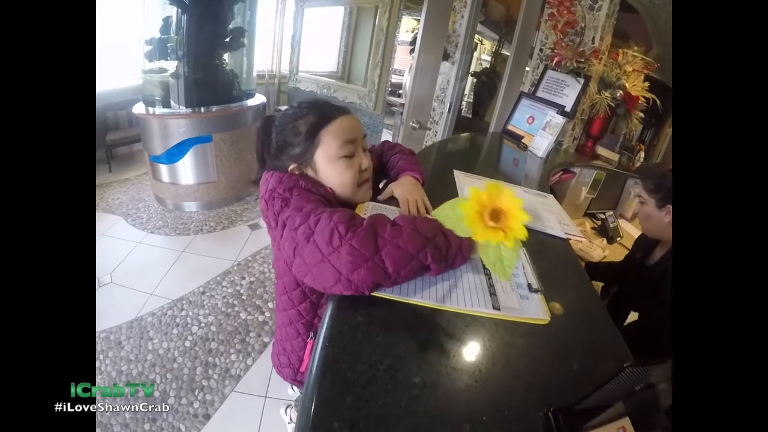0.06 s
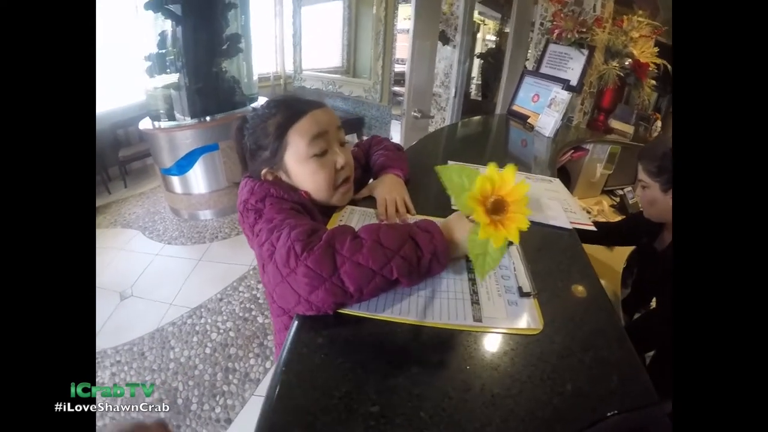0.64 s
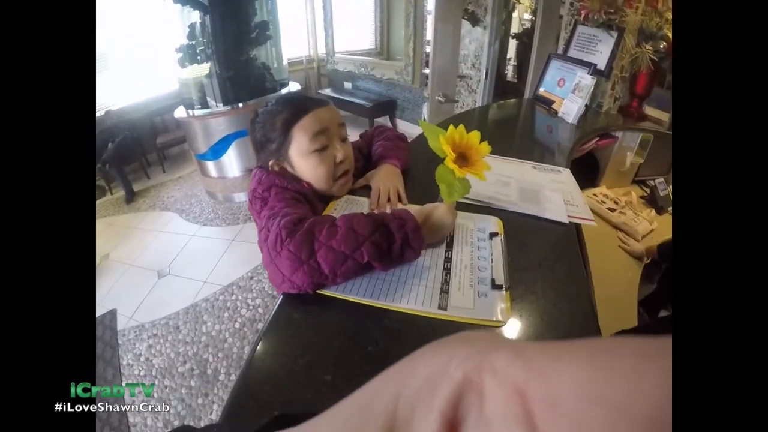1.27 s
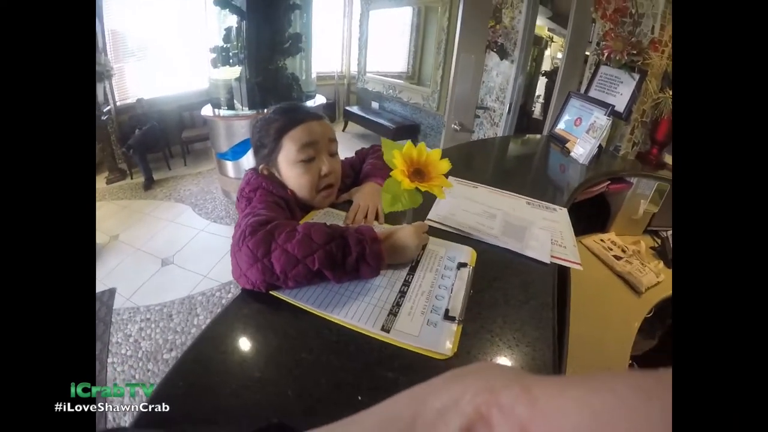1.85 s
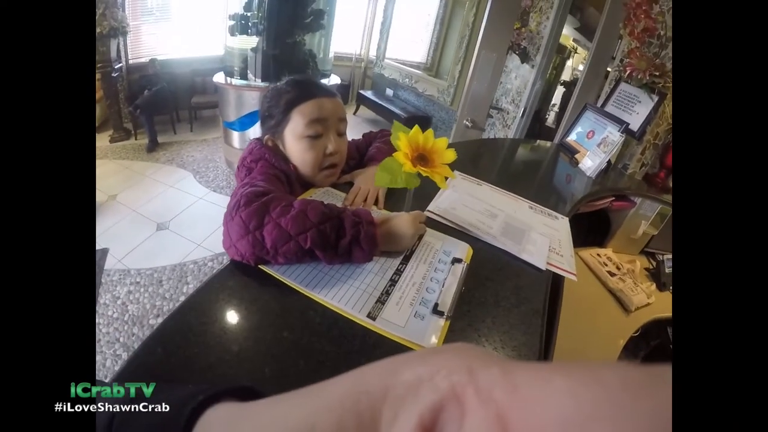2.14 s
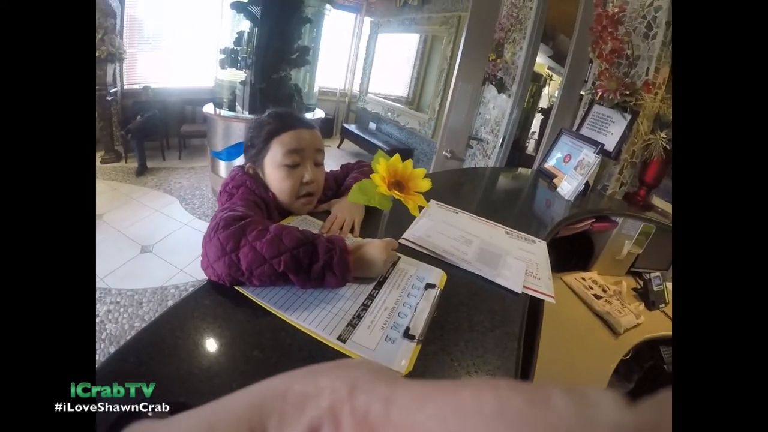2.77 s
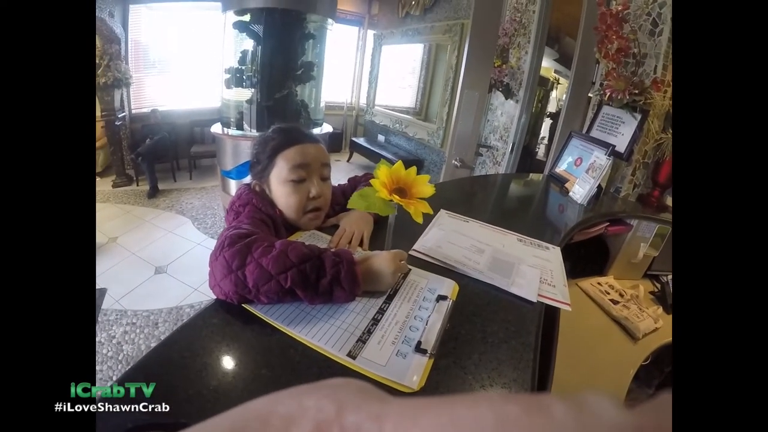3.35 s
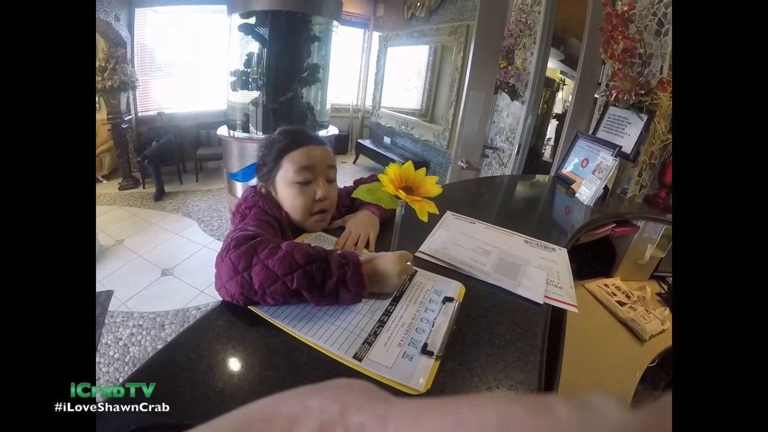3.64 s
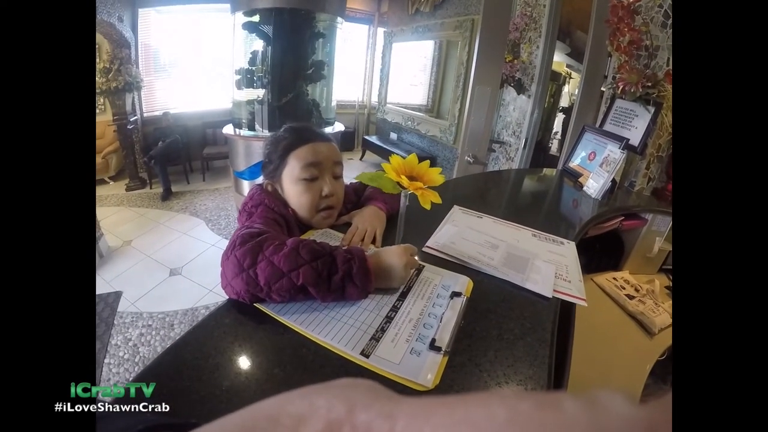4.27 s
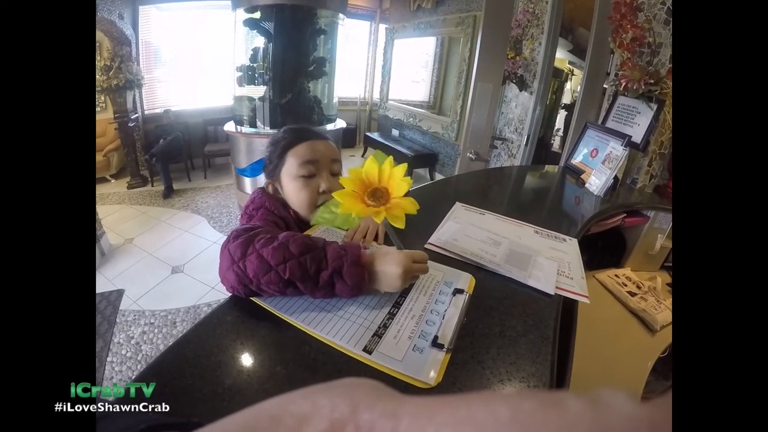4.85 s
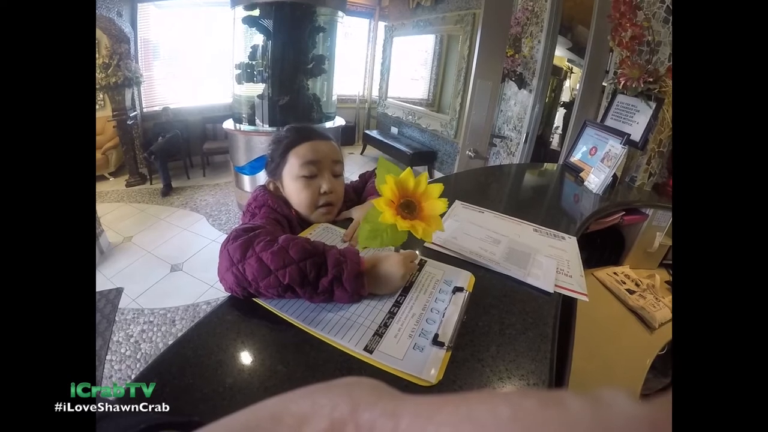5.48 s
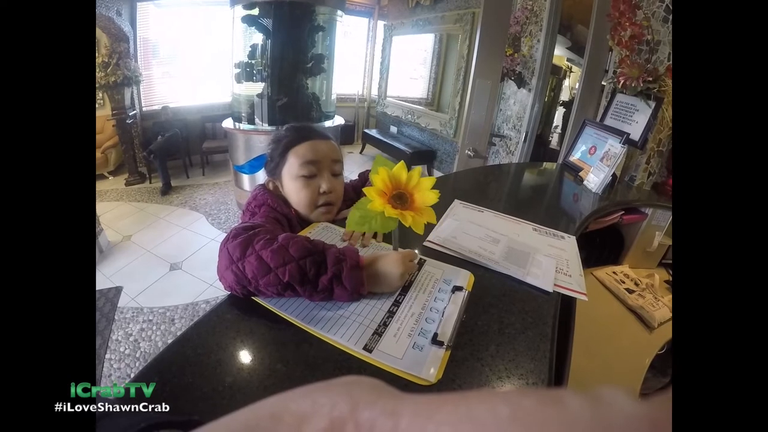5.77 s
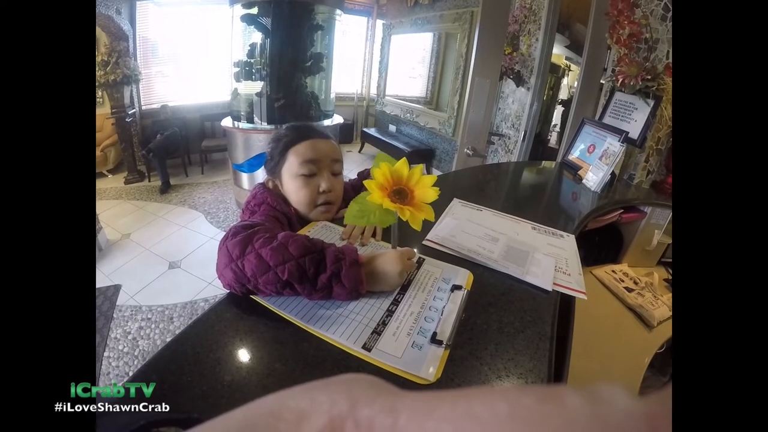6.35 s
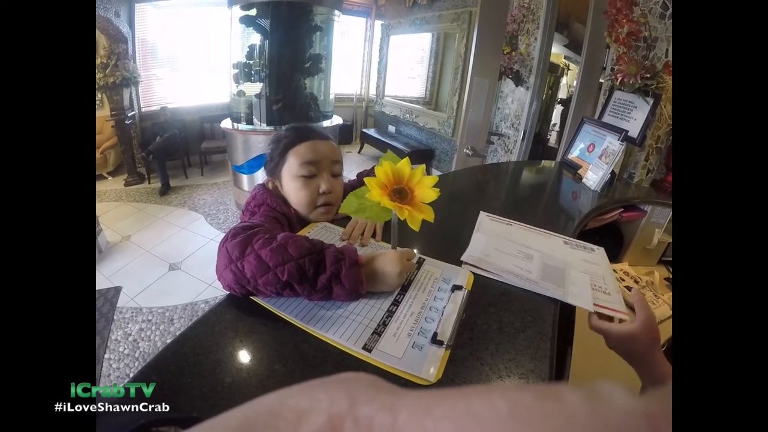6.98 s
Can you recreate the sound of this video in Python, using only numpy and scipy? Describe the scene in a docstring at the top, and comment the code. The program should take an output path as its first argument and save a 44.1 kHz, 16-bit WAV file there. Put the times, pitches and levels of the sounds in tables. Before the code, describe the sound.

For the first 1.2 seconds, fingers rub over a small camera's case, close and wide in stereo. From about 0.6 seconds they knock on it in a quick, loud cluster with dry plastic creaks, ending in a deep palm bump. A short silence follows.

At 1.4 seconds a pen starts writing on paper on a clipboard, in mono and much quieter than the knocks. Quick, scratchy strokes hiss while the board rings lightly beneath, strongest until about 2.3 seconds, when the room hiss also drops. Lighter strokes with small tip taps run from 2.7 to 4.5 seconds, pause briefly, and resume from 4.7 to 6.4 seconds. Between about 6.5 and 7 seconds a sheet slides very faintly over the desk. Faint air noise and ventilation hum lie under the writing, with little echo.

```python
"""A pen writes in quick strokes on paper on a clipboard, heard in mono: the tip hisses over the
fibres and the board rings under it. Before the writing, in stereo, fingers shift on a small camera,
rubbing and knocking its case between the two microphone ports; a short silent gap follows.
At the end a sheet slides over the desk. Faint air noise and ventilation hum lie under the writing."""
import sys
import numpy as np
from scipy import signal
from scipy.fft import rfft, irfft, next_fast_len
from scipy.io import wavfile
from scipy.ndimage import map_coordinates

SR = 44100
rng = np.random.default_rng(int(sys.argv[2]) if len(sys.argv) > 2 else 0)


def unload_wav(signal):
    """Save mono or channel-first audio to the path in sys.argv[1] as 16-bit WAV at rate SR, clipped to [-1, 1]."""
    wavfile.write(
        sys.argv[1],
        SR,
        np.round(np.clip(np.atleast_2d(signal).T, -1, 1) * 32767).astype(np.int16),
    )


N = 309566
TIME = np.arange(N) / SR
WRITING_FROM_S = 1.388

# pen strokes: start_s, speed_up_s, slow_down_s, level_db
PEN_STROKES = [(1.387, 0.0056, 0.04, -41.5), (1.411, 0.053, 0.059, -22.5), (1.524, 0.024, 0.066, -22),
               (1.589, 0.06, 0.047, -25.5), (1.707, 0.015, 0.07, -29.5), (1.776, .054, 0.057, -29),
               (1.89, 0.064, 0.043, -31), (2.004, 0.031, 0.043, -28.5), (2.096, 0.02, 0.056, -38),
               (2.147, 0.063, .035, -27), (2.252, 0.016, 0.09, -25), (2.612, 0.024, .085, -63.5),
               (2.746, 0.019, 0.071, -36.5), (2.835, 0.064, 0.031, -38), (2.927, 0.051, 0.04, -35),
               (3.022, 0.055, 0.031, -37), (3.111, 0.024, 0.074, -38), (3.189, .04, 0.047, -38),
               (3.281, 0.015, 0.059, -41), (3.328, 0.069, .029, -43.5), (3.442, .011, 0.043, -45.5),
               (3.503, 0.03, 0.026, -47.5), (3.576, 0.064, 0.049, -35.5), (3.697, .021, 0.018, -44.5),
               (3.734, 0.066, .015, -60), (3.811, .03, 0.07, -38.5), (3.911, 0.047, 0.025, -39),
               (3.999, .013, 0.068, -42), (4.079, .042, 0.023, -38), (4.164, 0.023, 0.046, -45.5),
               (4.256, 0.024, 0.028, -41), (4.324, .014, 0.068, -46), (4.411, 0.013, 0.011, -52.5),
               (4.42, 0.046, 0.081, -63), (4.74, 0.029, .012, -52.5), (4.788, 0.027, 0.095, -37.5),
               (4.971, 0.064, 0.059, -35), (5.084, 0.052, 0.053, -32.5), (5.181, 0.034, 0.11, -45),
               (5.262, 0.058, 0.043, -45.5), (5.383, 0.012, .066, -44.5), (5.452, 0.056, 0.035, -43),
               (5.567, .01, 0.057, -59), (5.612, 0.027, 0.066, -50.5), (5.687, 0.033, 0.06, -49),
               (5.768, 0.03, 0.059, -43), (5.887, .061, .072, -34.5), (6.031, 0.042, 0.057, -34),
               (6.13, 0.027, 0.06, -39.5), (6.201, 0.067, 0.034, -36.5), (6.305, 0.019, 0.056, -35.5),
               (6.357, .007, 0.079, -52.5)]
# where pen and paper ring, as a scratch and a higher fizz: pitch_hz, width_hz, level_db
SCRATCH_MODES = [(2130, 670, -15), (2740, 315, 3), (3226, 400, 1), (4900, 790, -3), (6090, 470, -3.5)]
FIZZ_MODES = [(7510, 710, 0), (9270, 480, -0.5), (11150, 500, -7.5), (12360, 830, 0.5), (14700, 1700, -8.5)]
# where the clipboard rings, and its deep notes, unevenly damped by the hand: pitch_hz, width_hz, level_db
BOARD_MODES = [(585.6, 79, -1.5), (771.3, 33.3, 4.5), (874, 47, -2.5), (1081, 54, -0.5), (1184, 52, -2.5),
               (1361, 77, -5.5), (1618, 55, -1), (2040, 260, -4.5)]
DEEP_MODES = [(191, 20.4, -17), (225, 28, -11.5), (308.8, 18.5, 1.5), (402.5, 31, 3.5), (468, 50, -2.5)]


def pen_writing(scratch_db=-1.5, fizz_db=-3, board_db=-2, deep_db=-3, unsteady_db=1.09):
    """A faster tip is louder and brighter; the board follows the speed less closely."""
    tip, force = np.zeros(N), np.zeros((2, N))
    for start, rise, fall, db in PEN_STROKES:
        n = int((rise + fall) * SR)
        speed = hand_speed(start, rise, fall, start + np.arange(n) / SR)
        scratch, fizz, board, deep = grip_levels(start + rise, db)
        pressure = amp(unsteady_db * wobble(115.6, n))
        rasp = tip_noise(SCRATCH_MODES, n, edge_hz=1600, drift=0.012, vary_db=4, rough_db=2)
        rasp *= amp(scratch + scratch_db) * speed ** 1.44
        hiss = tip_noise(FIZZ_MODES, n, edge_hz=6100, drift=0.014, vary_db=1.5, rough_db=1.5)
        hiss *= amp(fizz + fizz_db) * speed ** 1.77
        add(tip, start, pressure * (rasp + hiss))
        push = pressure * speed ** 0.81 * friction(250, 1.1, n)
        add(force, start, push * amp([[board + board_db], [deep + deep_db]]))
    ring = clipboard(force[0], BOARD_MODES, edge_hz=164)
    return tip + ring + clipboard(force[1], DEEP_MODES, edge_hz=110)


# the hand shifts its grip and weight, colouring the strokes: time_s, fizz_db, board_db, deep_db
HAND_GRIP = [(1.45, -2.5, -2.5, -4.5), (1.8, 0, -5.5, -11.5), (2.28, -.5, -3.5, -8.5),
             (2.88, 2.5, -12.5, -11), (3.15, 3, -13, -10), (3.5, 2.5, -14.5, -23), (3.65, 7.5, -13, -13.5),
             (3.85, 3, -12.5, -20), (4.33, 4.5, -10, -19.5), (4.82, 5, -17, -17.5), (5.03, 3.5, -13, -12.5),
             (5.31, 6.5, -17, -24), (5.42, 3, -8, -13), (5.71, 6, -9, -18), (5.8, 6, -19.5, -20.5),
             (6.07, 5, -10, -12), (6.18, 3, -14.5, -21)]


def grip_levels(time_s, db, usual_db=-47.5, fizz_growth=0.26, board_growth=0.74):
    """Scratch, fizz, board and deep board in dB: a harder stroke is brighter; the board grows less."""
    fizz, board, deep = curves(HAND_GRIP, time_s)
    effort = db - usual_db
    bright = fizz + fizz_growth * effort
    scratch = db - 10 * np.log10(1 + amp(bright) ** 2)  # scratch and fizz share the stroke's power
    shake = usual_db + board_growth * effort
    return scratch, scratch + bright, shake + board, shake + deep


def tip_noise(modes, n, edge_hz, drift, vary_db, rough_db, fine_db=2.5, fine_hz=170, glide=0.011):
    """Paper fibres pluck the tip; the pitches it rings at shift with the grip from stroke to stroke."""
    chance = rng.standard_normal((len(modes), 2))
    moved = [(hz * (1 + drift * a), width, db + vary_db * b)
             for (hz, width, db), (a, b) in zip(modes, chance)]
    power = lambda f: sum(amp(db) ** 2 / (1 + (2 * (f - hz) / width) ** 2) for hz, width, db in moved)
    colour = lambda f: highpass(f, edge_hz) * np.sqrt(power(f)) * amp(fine_db * ripple(f, fine_hz))
    hiss = filtered(friction(1500, rough_db, n), colour)
    # the pen tilts as it moves, so its pitches also glide within a stroke
    place = np.cumsum(1 + glide * wobble(13, n))
    return unit(map_coordinates(hiss, [place], mode="mirror"))


def clipboard(force, modes, edge_hz):
    """The board rings under the tip; plain white noise would come out as strong as it went in."""
    board = lambda f: resonances(modes, f) * highpass(f, edge_hz) / np.sqrt(1 + (f / 2500) ** 4)
    average_gain = np.sqrt(np.mean(np.abs(board(np.fft.rfftfreq(SR, 1 / SR))) ** 2))
    return filtered(force, board) / average_gain


# the tip lands on the paper: time_s, level_db, board_share_db
PEN_TAPS = [(1.397, -33.5, 2.5), (2.736, -27, -8), (3.148, -24, -17), (3.74, -40, -38), (3.794, -39.5, -28),
            (4.764, -28.5, -13), (4.973, -27.5, -19), (5.392, -36, -14), (6.019, -44, -14)]


def pen_taps(click_db=2, knock_db=9, deep_db=10, click_fade_s=0.012, knock_fade_s=0.0089, rise_s=0.001):
    """The landing tip clicks and kicks the board."""
    click, force = np.zeros(N), np.zeros(N)
    t = np.arange(SR // 10) / SR
    delay_s = 0.002  # the paper gives way before the tip meets the board
    for start, db, share_db in PEN_TAPS:
        burst = amp(db) * (1 - np.exp(-t / rise_s)) * rng.standard_normal((2, len(t)))
        add(click, start, burst[0] * amp(click_db - 60 * t / click_fade_s))
        add(force, start + delay_s, burst[1] * amp(share_db - 60 * t / knock_fade_s))
    tick = filtered(click, lambda f: resonances(SCRATCH_MODES, f) + amp(-8) * resonances(FIZZ_MODES, f))
    knock = amp(knock_db) * clipboard(force, BOARD_MODES, edge_hz=170)
    return tick + knock + amp(deep_db) * clipboard(force, DEEP_MODES, edge_hz=170)


# fingers slip, knock and slide on: start_s, level_db, treble_db_per_octave, slide_db, slide_s
FINGER_KNOCKS = [(0.058, -31, -8, -56, .03), (0.185, -17.5, -20, -46, .035), (.582, 2, -1.5, -23, .08),
                 (0.6898, 2, 3.5, -28, 0.053), (0.783, 0, 0, -29, 0.042), (.849, -19, -7.5, -52, .04),
                 (.9003, 0.5, -17, -27, 0.07), (0.968, 2, -3, -32.5, 0.037), (1.0483, -0.5, -1, -23, 0.058),
                 (1.131, -7.5, -2, -24.5, 0.033)]
# notes of the case (a minus gain pushes a port the other way): pitch_hz, swell_s, left_gain, right_gain
CASE_MODES = [(188, 0.0021, -0.13, 0.73), (380, 0.0008, -0.5, 0.37), (596, 0.00052, -0.33, 0.47),
              (940, 0.00027, -0.59, 0.33), (2160, 0.0011, 0.084, .06), (4630, 0.00017, 0.062, 0.017)]


def finger_knocks(shape=1.4, detune=0.025, lag_s=0.0001, treble_from_hz=700):
    """Soft fingers knock the case and damp it quickly; the flex reaches the left port later."""
    out, t = np.zeros((2, N)), np.arange(SR // 20) / SR
    age = np.maximum([t - lag_s, t + lag_s / 2], 0)
    for start, db, tilt, *_ in FINGER_KNOCKS:
        for hz, swell, left, right in CASE_MODES:
            envelope = (age / swell * np.exp(1 - age / swell)) ** shape
            tone = np.sin(2 * np.pi * hz * (1 + detune * rng.normal()) * age)
            gain = amp(db + tilt * np.log2(max(hz / treble_from_hz, 1)))
            add(out, start, gain * envelope * tone * [[left], [right]])
    # the camera's wind filter cuts the deep bass from the knocks
    return filtered(out, lambda f: highpass(f, edge_hz=144, order=12))


def finger_slides(rise_share=0.52):
    """Strength of the short slide that follows each knock."""
    return sum(amp(db) * hand_speed(start, rise_share * length, (1 - rise_share) * length)
               for start, _, _, db, length in FINGER_KNOCKS)


# fingers drag over the case: time_s, rub_db, hiss_db
FINGER_DRAG = [(0, -46.5, -44), (.16, -43.5, -45.5), (.25, -37, -48), (.32, -29, -43), (.48, -27.5, -41),
               (.56, -27, -42), (.66, -32.5, -48.5), (.75, -43, -56), (.84, -42, -53.5), (.88, -38.5, -57),
               (.945, -31, -35), (1.005, -36.5, -51.5), (1.05, -27, -37), (1.14, -20, -31),
               (1.178, -21, -46.5), (1.197, -42, -60), (1.22, -130, -130)]
# tone colours of skin on the case, from low to high: pitch_hz, level_db
THUD_COLOUR = [(30, -25.5), (105, -31.5), (128, -10), (150, 2.5), (230, -0.5), (340, -2), (520, -24.5),
               (1200, -68.5)]
RUB_COLOUR = [(120, -43), (240, -6.5), (390, 5.5), (780, 0.5), (1300, -2.5), (1750, -4.5), (2200, -8.5),
              (2900, -17.5), (5000, -51)]
HISS_COLOUR = [(1200, -26.5), (2800, -3.5), (4200, 3.5), (7000, 0), (9000, -13), (12000, -19.5),
               (16000, -34)]
# the hollow case rings under a sliding finger: pitch_hz, width_hz, level_db
HOLLOW_MODE = [(2130, 470, 0)]


def finger_rubbing(thud_db=-6, rub_db=-0.5, ring_db=-15, patchy_db=2, usual_db=-26, thud_growth=0.65):
    """Moving fingers rub and hiss; the case thuds with the rub and rings under the slides."""
    drag, hiss = amp(curves(FINGER_DRAG))
    slides = finger_slides()
    rub = np.hypot(drag, slides)
    thud = amp(usual_db) * (rub / amp(usual_db)) ** thud_growth * (TIME < WRITING_FROM_S)
    sound = amp(thud_db) * thud * skin_noise(THUD_COLOUR, rate_hz=55, rough_db=5)
    patchy_rub = rub * amp(rub_db + patchy_db * wobble(45))
    sound += patchy_rub * skin_noise(RUB_COLOUR, rate_hz=300, rough_db=2, fine_db=2.5)
    sound += hiss * skin_noise(HISS_COLOUR, rate_hz=500, rough_db=1)
    ring = unit(filtered(friction(300, 2.5), lambda f: resonances(HOLLOW_MODE, f) ** 2))
    return sound + amp(ring_db) * slides * ring


# how alike the two microphone ports sound (1 the same, -1 opposite): pitch_hz, likeness
PORT_LIKENESS = [(100, .5), (250, -0.11), (600, -0.84), (1400, -0.67), (3000, 0.092), (7000, 0.21),
                 (15000, 0)]


def skin_noise(spectrum, rate_hz, rough_db, fine_db=1, fine_hz=220):
    """Skin rubs the case, which flexes and pushes the two ports opposite ways at middle pitches."""
    turn = lambda f: np.arccos(np.clip(along(PORT_LIKENESS, f), -1, 1)) / 2
    # the gaps under the fingers add narrow peaks, none in the bass
    colour = lambda f: amp(along(spectrum, f) + fine_db * ripple(f, fine_hz) * highpass(f, edge_hz=440))
    pair = np.array([friction(rate_hz, rough_db), friction(rate_hz, rough_db)])
    mid, side = filtered(pair, lambda f: colour(f) * [np.cos(turn(f)), np.sin(turn(f))])
    return unit(np.array([mid + side, mid - side]))


# squeaks under the fingers: start_s, rise_s, fall_s, level_db
FINGER_SQUEAKS = [(-.04, 0.047, 0.052, -50), (0.101, 0.043, 0.052, -49.5)]


def finger_squeaks(pitch_hz=1388, waver_hz=14):
    """A thin, faint tone wavers under the fingers."""
    tone = np.sin(2 * np.pi * np.cumsum(pitch_hz + waver_hz * wobble(76)) / SR)
    return tone * sum(amp(db) * hand_speed(start, rise, fall) for start, rise, fall, db in FINGER_SQUEAKS)


# the case creaks with a dry tick: time_s, level_db, pitch_hz
CASE_CREAKS = [(0.361, -26.5, 3230), (.6905, -26, 2000), (.932, -29.5, 6400), (1.0882, -9, 1390),
               (1.089, -15, 3200), (1.128, -20, 3500), (1.147, -19.5, 3400)]


def case_creaks(fade_s=0.019, width_share=0.88):
    """The plastic gives short cracks, with separate noise at each port."""
    out, t = np.zeros((2, N)), np.arange(SR // 20) / SR
    for start, db, hz in CASE_CREAKS:
        colour = lambda f: resonances([(hz, width_share * hz, 0)], f) ** 2 / (1 + (f / 9000) ** 4)
        crack = unit(filtered(rng.standard_normal((2, len(t))), colour))
        add(out, start, crack * amp(db - 60 * t / fade_s))
    return out


def palm_bump(bump_db=-19, press_db=-41):
    """The palm closes over both ports with a deep bump."""
    # tone colour of the bump: pitch_hz, level_db
    colour = [(20, -13.5), (45, -2), (70, -3), (95, -8.5), (155, -2), (260, -11.5), (600, -58)]
    press = amp(press_db) * hand_speed(0.96, 0.19, 0.034)
    bump = amp(bump_db) * hand_speed(1.149, 0.011, 0.038)
    return coloured(rng.standard_normal(N), colour) * (press + bump)


# tone colour of sliding paper: pitch_hz, level_db
PAPER_COLOUR = [(300, -27.5), (1900, -5), (2450, 4), (3400, -2.5), (5500, -5), (10000, -4.5), (13000, -5.5),
                (16000, -18.5)]
# how loudly the sheet slides: time_s, level_db
PAPER_PULL = [(6.44, -83), (6.55, -71.5), (6.72, -88), (6.795, -73), (6.843, -82), (6.865, -58.5),
              (6.9, -56.5), (6.95, -70.5), (7.01, -77)]


def sliding_sheet():
    """Paper whispers as it rubs across the desk."""
    whisper = coloured(friction(400, 2.5), PAPER_COLOUR)
    level_db, = curves(PAPER_PULL)
    return whisper * amp(level_db) * (TIME > PAPER_PULL[0][0])


# tone colour of the room's air: pitch_hz, level_db
AIR_COLOUR = [(30, -24), (200, -5), (800, 1), (2000, -2.5), (6000, -8), (15500, -9.5)]
# how loud the room noise is: time_s, level_db
AIR_LEVEL = [(1.39, -53), (2.33, -57.5), (2.39, -73), (7, -72)]


def office_air(hum_hz=120, hum_db=-21):
    """The air hisses faintly and the ventilation hums."""
    air = coloured(rng.standard_normal(N), AIR_COLOUR)
    hum = amp(hum_db) * np.sin(2 * np.pi * hum_hz * TIME)
    level_db, = curves(AIR_LEVEL)
    return amp(level_db) * (air + hum)


def room_echo(x, fade_s=0.19, echo_db=-19):
    """The desk and walls add a short, weak tail."""
    t = np.arange(SR // 2) / SR
    tail = rng.standard_normal(len(t)) * amp(-60 * t / fade_s)
    return x + amp(echo_db) * signal.fftconvolve(x, tail / np.linalg.norm(tail))[:N]


def hand_speed(start, rise, fall, t=TIME):
    """A hand movement speeds up from rest and comes to rest again."""
    return np.sin(np.interp(t - start, [0, rise, rise + fall], [0, np.pi / 2, np.pi])).clip(0)


def friction(rate_hz, rough_db, n=N):
    """Rubbing noise that catches and lets go about rate_hz times a second."""
    return unit(rng.standard_normal(n) * amp(rough_db * wobble(rate_hz, n)))


def wobble(rate_hz, n=N):
    """A smooth curve through rate_hz random points a second."""
    return map_coordinates(rng.standard_normal(int(n * rate_hz / SR) + 4), [np.arange(n) * rate_hz / SR])


def ripple(f, spacing_hz):
    """Smooth random peaks and dips from low to high pitch."""
    return map_coordinates(rng.standard_normal(int(SR / 2 / spacing_hz) + 4), [f / spacing_hz])


def resonances(modes, f):
    """How an object answers each frequency; its modes are the pitches it rings at."""
    return sum((-1) ** k * amp(db) * 1j * f * width / (hz * hz - f * f + 1j * f * width)
               for k, (hz, width, db) in enumerate(modes))


def highpass(f, edge_hz, order=4):
    """Gain that falls steeply below edge_hz."""
    return (f / edge_hz) ** order / np.sqrt(1 + (f / edge_hz) ** (2 * order))


def filtered(x, response):
    """Turn each frequency of x up or down by response(frequency)."""
    n = x.shape[-1]
    padded = next_fast_len(n + 8192)
    return irfft(rfft(x, padded) * response(np.fft.rfftfreq(padded, 1 / SR)), padded)[..., :n]


def coloured(noise, colour):
    """Give noise a tone colour, at strength 1."""
    return unit(filtered(noise, lambda f: amp(along(colour, f))))


def along(points, hz):
    """Read a table of pitch_hz, value at any pitch, with octaves evenly spaced."""
    pitches, values = np.transpose(points)
    return np.interp(np.log(hz + 1), np.log(pitches + 1), values)


def curves(rows, t=TIME):
    """Read each column after time_s at the times t."""
    times, *columns = np.transpose(rows)
    return [np.interp(t, times, column) for column in columns]


def amp(db):
    """Decibels to gain."""
    return 10 ** (np.asarray(db) / 20)


def unit(x):
    """Scale to an average strength (rms) of 1."""
    return x / np.sqrt(np.mean(x ** 2) + 1e-20)


def add(track, start_s, sound):
    """Mix a sound into a track at start_s."""
    i = round(start_s * SR)
    track[..., i:i + sound.shape[-1]] += sound[..., :N - i]


def scene():
    """Fingers on the camera in stereo first, then the writing in mono."""
    desk = room_echo(pen_writing() + pen_taps() + sliding_sheet()) + office_air()
    skin = (finger_rubbing() + finger_squeaks()) * amp([[-0.5], [0.5]])  # a little louder on the right
    camera = skin + finger_knocks() + case_creaks() + palm_bump()
    return camera + desk * (TIME > WRITING_FROM_S)


def record(dry, top_hz=16050):
    """The knocks overload the input; nothing passes above top_hz."""
    clipped = dry / (1 + np.abs(dry) ** 10) ** (1 / 10)
    return filtered(clipped, lambda f: np.sin(np.pi / 2 * np.clip((top_hz - f) / 500, 0, 1)) ** 2)


dry = scene()
out = record(dry)
unload_wav(out)
```